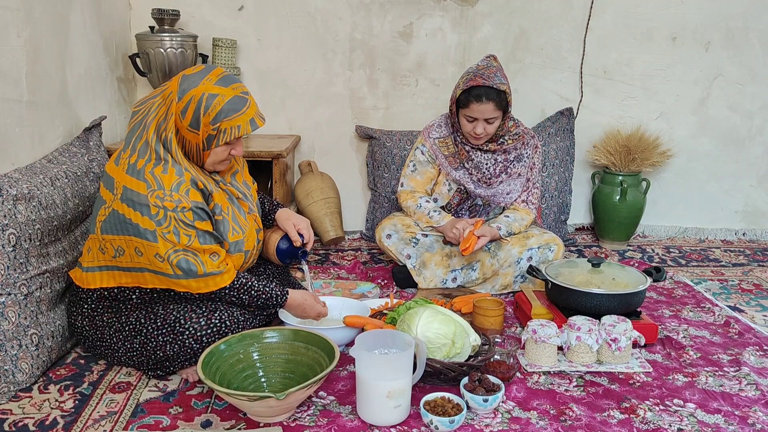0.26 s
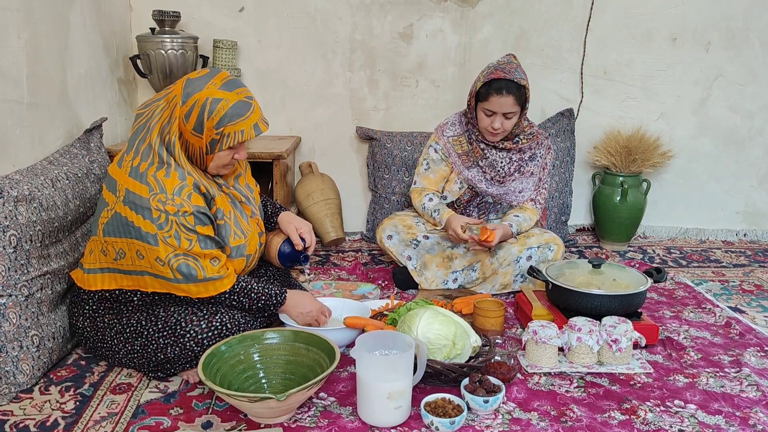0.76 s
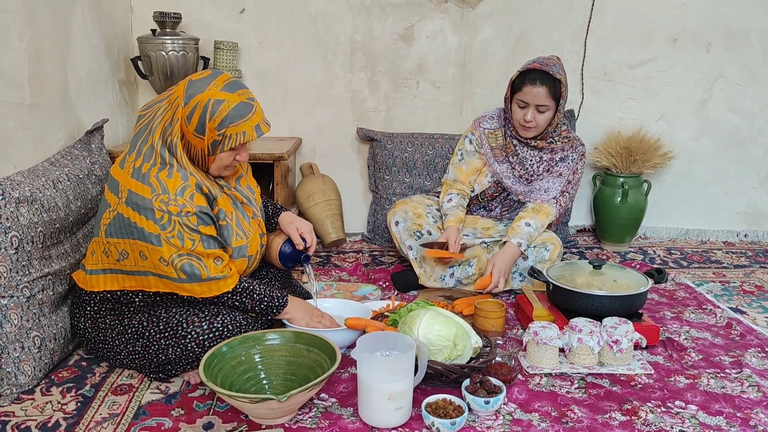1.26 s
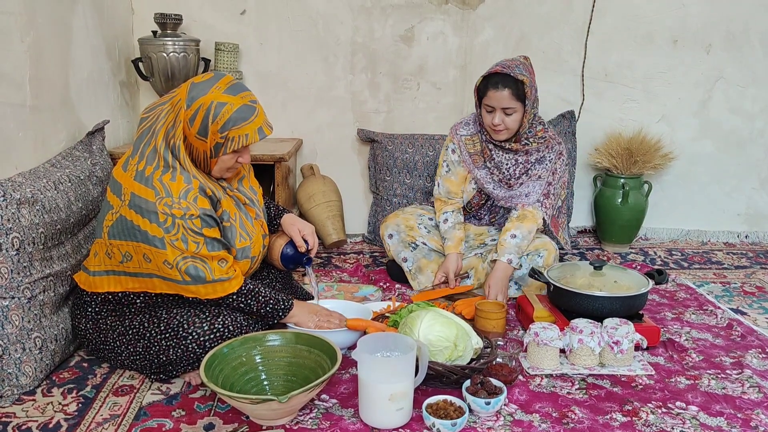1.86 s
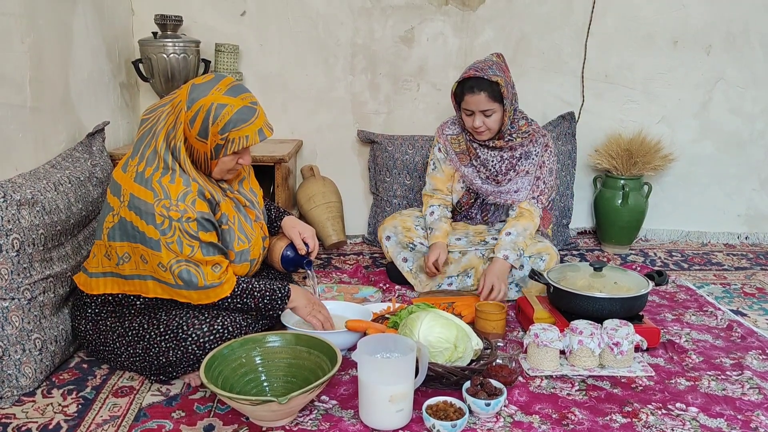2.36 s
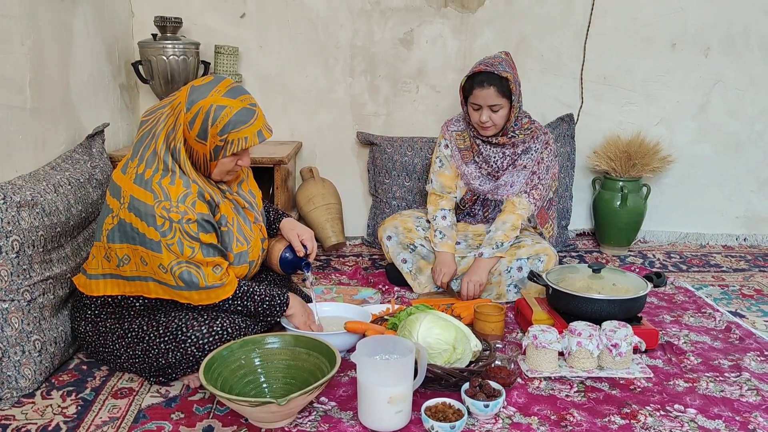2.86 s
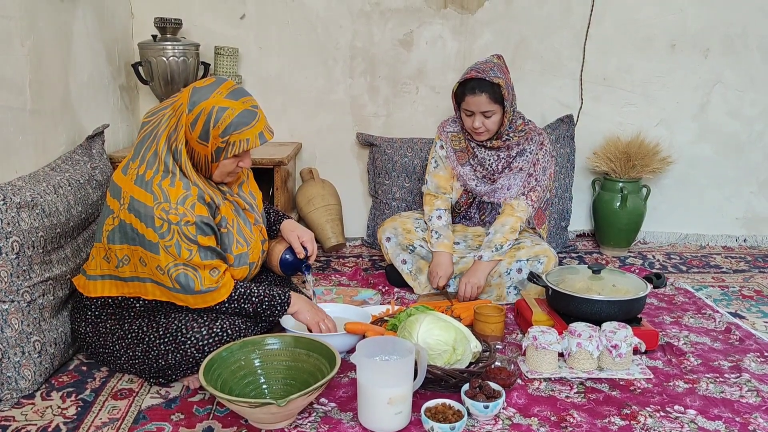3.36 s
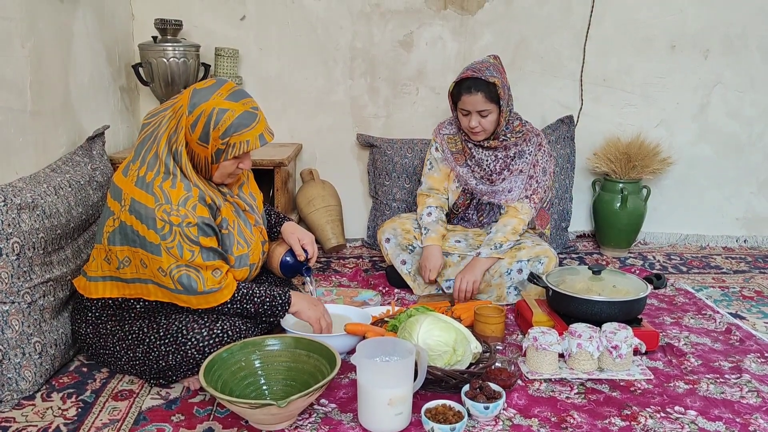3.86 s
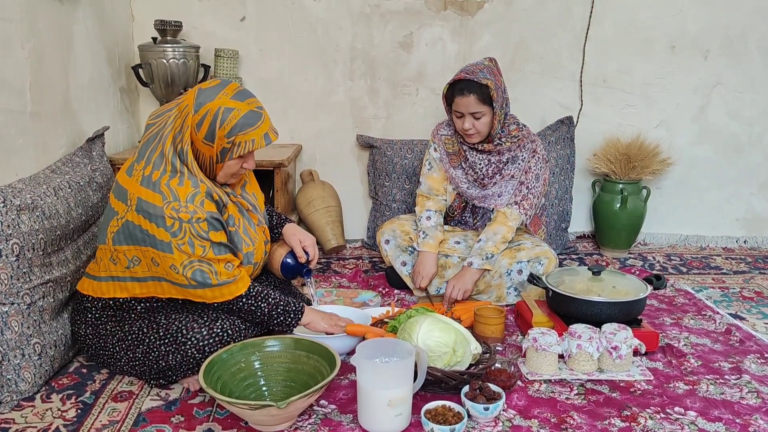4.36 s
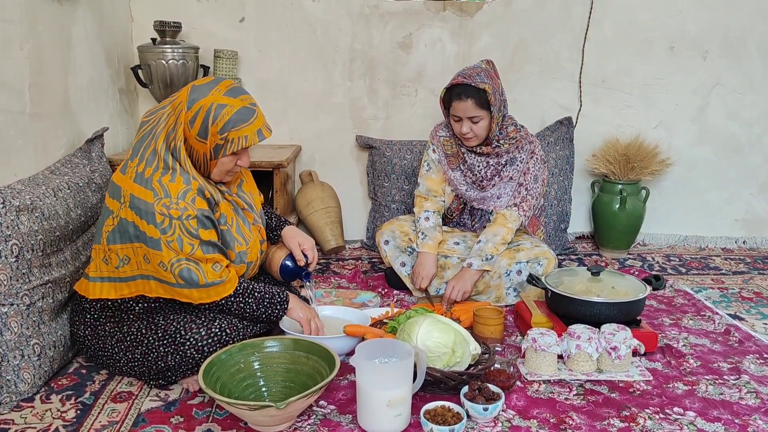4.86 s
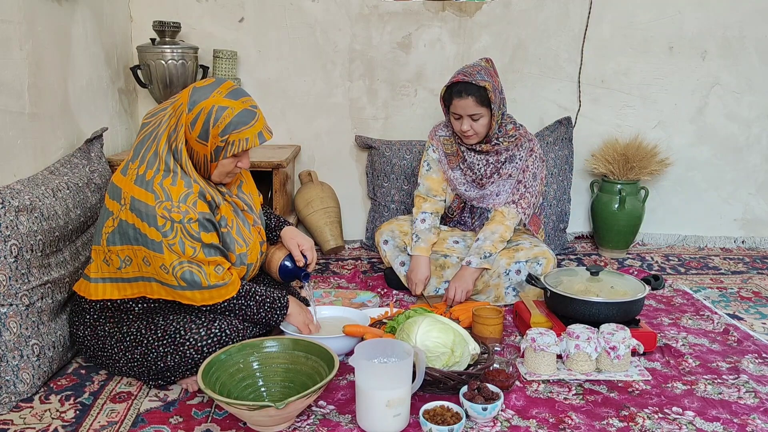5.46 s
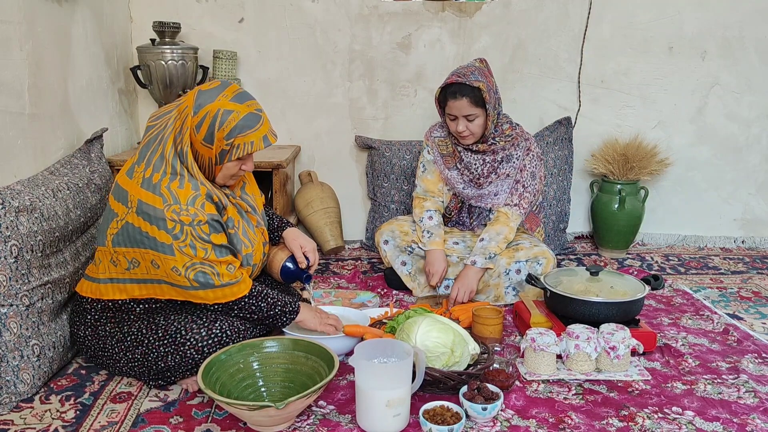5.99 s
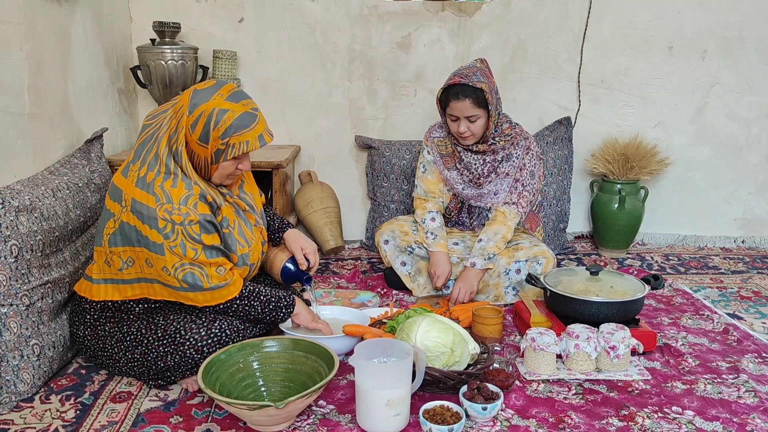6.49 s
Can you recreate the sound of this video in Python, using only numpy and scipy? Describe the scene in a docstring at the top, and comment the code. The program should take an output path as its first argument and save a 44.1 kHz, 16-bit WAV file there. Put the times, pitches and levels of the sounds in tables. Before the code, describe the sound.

Continuous irregular swishing and scratching of soaked grains, with bright plips of bubbles and little flicks against the bowl. Dull muffled knocks and a faint board shuffle sit below in the first two seconds or so. Two loud, woody carrot cuts follow, each a very quick double blow. A tiny rising gurgle comes near the end. Lively small carpeted room, near stereo microphone, quiet background.

```python
"""Rinsing rice and cutting carrot

Indoors, a hand stirs and rubs rice in a bowl of water while a knife cuts carrot on a wooden board on carpet.
Filtered grain noise rasps, chirped decaying sines plop as bubbles, and struck modes with noise bursts make
two cuts, each of two blows. Things set down ring low modes of the floor and the hollow under the board.
Echoes and a decaying tail surround these sounds; a faint hush of coloured noise lies beneath."""
import sys
import numpy as np
from scipy import signal
from scipy.fft import rfft, irfft, next_fast_len
from scipy.io import wavfile
from scipy.ndimage import uniform_filter1d

SR = 44100
rng = np.random.default_rng(int(sys.argv[2]) if len(sys.argv) > 2 else 0)


def log_audio(samples):
    """Write samples as a 16-bit WAV file to the path given in sys.argv[1]."""
    # one column per channel
    frames = np.atleast_2d(samples).T
    # limit to full scale, then quantise
    limited = np.clip(frames, -1, 1)
    pcm = np.round(limited * 32767).astype(np.int16)
    wavfile.write(sys.argv[1], SR, pcm)


N = 296821

# spectra of the wet grains, from coarse rasp to slosh: frequency_hz, relative_level_db (per Hz)
RASP_SPECTRUM = [(1200, -23.5), (2200, -4), (2800, -2.5), (3500, 0), (4800, -4.5), (5800, -22.5)]
SHARP_SPECTRUM = [(4600, -19), (5600, -5), (7000, 0), (7600, -5), (8300, -25.5)]
SAND_SPECTRUM = [(6000, -21), (8300, -0.5), (10000, 0), (12000, 4.5), (14500, -4)]
SLOSH_SPECTRUM = [(300, -25), (600, 5), (1000, 4), (1500, 1), (2200, -18.5)]
FIZZ_DB = -6  # re rasp
RUB_GAIN = .42  # overall gain of the rubbing, before the room


def rinsing():
    """Stick-slip friction: wet grains rasp in bursts and free small bubbles while the water slops about."""
    rasp_gain, sharp_gain, sand_gain, slosh_gain = strokes()
    # every grain size slips and catches in its own time
    rasp = unit(colour(grains(1500, 3.8, .6), RASP_SPECTRUM)) * undb(3.8 * walk(40))
    sharp = unit(colour(grains(2500, 3.8, 0.51), SHARP_SPECTRUM)) * undb(2.94 * walk(40))
    sand = unit(colour(grains(810, 3.3, 0.94), SAND_SPECTRUM)) * undb(4.0 * walk(30))
    slosh = unit(colour(grains(300, 3.0, 0.47), SLOSH_SPECTRUM)) * undb(1.65 * walk(25))
    rubbing = rasp_gain * (rasp + undb(FIZZ_DB) * fizz(per_s=300))
    return RUB_GAIN * (rubbing + sharp_gain * sharp + sand_gain * sand + slosh_gain * slosh)


# strokes of the hand through the rice, levels before RUB_GAIN: peak_s, rise_s (over 10 dB), fall_s (over 10 dB),
# rasp_level_db, then in dB re rasp: sharp_db, sand_db, slosh_db
HAND_STROKES = [(.01, .02, .08, -61, -2, -12, -3), (.08, .02, .13, -53.5, -2, -16, -22),
                (.27, .02, .12, -59, -1, -2, -24), (.53, .08, .2, -59, -3, -20, -13),
                (.635, .015, .12, -64, 2, 0, -15), (.78, .02, .06, -53, -12, -22, -5),
                (.89, .06, .05, -52.5, -3, -8, -16), (1.0, .04, .1, -72, 10, 2, 9),
                (1.17, .12, .2, -66, 7, -2, 1), (1.5, .08, .05, -59.5, -5, -15, -4),
                (1.66, .04, .05, -61, -8, -24, -14), (1.83, .05, .1, -58.5, -6, -20, -9),
                (1.985, .04, .12, -60, -2, -5, -6), (2.13, .06, .05, -63, -6, -20, -4),
                (2.19, .03, .05, -60, -6, -17, -14), (2.28, .015, .08, -58.5, -15, -16, 0),
                (2.41, .12, .08, -52, -4, -13, -10), (2.54, .02, .2, -62, 4, -4, -10),
                (2.67, .1, .25, -55, -3, -11, -22), (2.88, .12, .1, -64, 1, -9, 3),
                (2.985, .1, .03, -59, 3, -5, -8), (3.09, .03, .05, -60.5, -9, -24, -19),
                (3.18, .04, .06, -58.5, -4, -16, -20), (3.28, .02, .12, -59, 1, -11, -24),
                (3.4, .015, .12, -53.5, 1, -22, -1), (3.66, .1, .17, -49.5, -5.5, -24, -5),
                (3.87, .15, .1, -51, -4, -16, -4), (4.12, .05, .1, -61.5, 3, -16, -17),
                (4.18, .04, .1, -58, 3, -2, -20), (4.28, .04, .08, -60, -6, -14, -20),
                (4.35, .04, .1, -62, -2, -4, 0), (4.41, .05, .15, -58, -4, -15, -7),
                (4.53, .05, .1, -61, 0, -18, -4), (4.78, .02, .06, -55, -10, -28, 0),
                (4.86, .04, .12, -57, -5, -24, -2), (5.01, .06, .1, -57, -1, -10, -7),
                (5.18, .14, .14, -50.5, 2, -9, -7), (5.59, .02, .12, -60, -8, -18, -8),
                (5.71, .06, .06, -59.5, -3, -14, -7), (5.93, .06, .09, -60, 0, -9, -9),
                (6.09, .015, .06, -60.5, -20, -30, -16), (6.24, .02, .08, -68, -4, -16, -8),
                (6.49, .06, .1, -61, -10, -12, -6), (6.62, .1, .3, -58.5, -1, -9, -5)]
# fingers resting in the rice between strokes: rasp_level_db, then in dB re rasp: sharp_db, sand_db, slosh_db
RESTING_HAND = (-74, 0, -8, 3)


def strokes():
    """Power summation: exponential swells and decays add in power to the resting hand, giving four gains."""
    def layer_gains(rasp_db, *relative_db):
        return undb(rasp_db + np.array([0, *relative_db]))[:, None]

    t = np.arange(0, N / SR, .002)
    power = layer_gains(*RESTING_HAND) ** 2
    for peak_s, rise_s, fall_s, *levels_db in HAND_STROKES:
        swell = undb(-10 * np.maximum((peak_s - t) / rise_s, (t - peak_s) / fall_s))
        power = power + (layer_gains(*levels_db) * swell) ** 2
    return [np.interp(np.arange(N) / SR, t, np.sqrt(p)) for p in power]


def grains(per_s, scatter_db, bed):
    """Shot noise: random clicks of uneven size over a steady bed of noise."""
    size = np.minimum(rng.exponential(size=N), 4)
    clicks = (rng.random(N) < per_s / SR) * rng.standard_normal(N) * undb(scatter_db * size)
    return unit(clicks) + bed * rng.standard_normal(N)


def fizz(per_s):
    """Random superposition: small bubbles freed at random between the grains, most of them weak."""
    out = np.zeros(N)
    for when, size, strength in rng.random((int(per_s * N / SR), 3)):
        add(out, when * N / SR, strength ** 5.4 * plop(1500 * 4.35 ** size, 9.4, 0.089))
    return unit(out)


# the larger plops: start_s, nominal pitch_hz, level_db
LARGE_BUBBLES = [(0.077, 5460, -41.5), (0.119, 4600, -55), (0.272, 2130, -54), (0.31, 2840, -48),
                 (0.513, 1400, -56), (0.549, 3720, -50), (0.784, 2280, -43.5), (0.866, 2930, -44.5),
                 (0.88, 3710, -47), (0.993, 1540, -55.5), (1.173, 1140, -58.5), (1.651, 5050, -53.5),
                 (1.809, 2470, -53), (1.83, 2100, -53), (2.187, 4300, -52), (2.277, 1440, -53.5),
                 (2.363, 1860, -47), (2.405, 1350, -52), (2.631, 2220, -52), (2.733, 1180, -53),
                 (3.079, 2190, -53.5), (3.178, 2620, -56), (3.271, 3650, -49), (3.341, 2090, -54),
                 (3.66, 3430, -46), (4.405, 2660, -52), (4.766, 2890, -47.5), (4.809, 740, -53.5),
                 (4.93, 1404, -55.5), (5.03, 1047, -55), (5.764, 966, -59), (5.907, 3280, -56),
                 (5.944, 1510, -58), (6.014, 1213, -49), (6.086, 2550, -48.5), (6.291, 2370, -61),
                 (6.424, 1115, -63), (6.567, 3860, -51), (6.572, 1170, -59), (6.593, 2140, -52.5)]


def bubbles():
    """Bubble resonance: each large plop is joined by two of nearly its size within 15 ms."""
    out = np.zeros(N)
    companions = rng.uniform(-1, 1, (len(LARGE_BUBBLES), 2, 2))
    for (start_s, pitch_hz, level_db), chance in zip(LARGE_BUBBLES, companions):
        add(out, start_s, undb(level_db) * plop(.96 * pitch_hz, 7.3, 0.036))
        for late, detune in chance:
            companion = plop((0.968 + 0.067 * detune) * pitch_hz, 5.7, 0.034)
            add(out, start_s + .015 * abs(late), undb(level_db - 3.5) * companion)
    return out


# a trapped pocket of air; pitch and level here are centres that each bubble scatters about
GURGLE_S, GURGLE_LENGTH_S, GURGLE_DB = 6.0, .22, -61.5
GURGLE_HZ, GURGLE_RISE_HZ_PER_S = 1100, 900


def gurgle(count=12):
    """Bubble resonance: a trapped pocket of air lets out a quick string of bubbles that climbs in pitch."""
    out = np.zeros(N)
    for k, (late, detune, size) in enumerate(rng.uniform(-1, 1, (count, 3))):
        since_s = (k + .4 * late) / count * GURGLE_LENGTH_S
        pitch_hz = (GURGLE_HZ + GURGLE_RISE_HZ_PER_S * since_s) * (1 + .04 * detune)
        add(out, GURGLE_S + since_s, undb(GURGLE_DB + 3.0 * size) * plop(pitch_hz, 8.5, 0.02))
    return out


def plop(hz, cycles, rise):
    """Damped bubble resonance: a decaying sine rises in pitch as the bubble nears the surface."""
    life_s = cycles / hz
    t = np.arange(int(7 * life_s * SR)) / SR
    return np.sin(2 * np.pi * hz * (t + rise * t ** 2 / life_s)) * np.exp(-t / life_s)


# grains and peel flicked against the bowl: start_s, level_db, sharp_db (re level), wet_slap_db (re level)
FLICKS = [(.071, -56, -1, -30), (.259, -57.5, 1.5, -25), (.463, -62, -6, -25), (.506, -58.5, -2, -24),
          (.625, -61, 6, -25), (.772, -57.5, -12, 1), (2.18, -61, -3, -25), (2.27, -60, -14, 2.5),
          (2.72, -66.5, -6, 6), (3.071, -63, -3, -25), (3.159, -59.5, -1, -27), (3.384, -59, 3.5, 1),
          (4.162, -59, 6, -25), (4.18, -63, 6, -25), (4.196, -64, 8, -25), (4.339, -68.5, 0, 5),
          (4.77, -62.5, -13, 5), (5.163, -59, 8, -25), (6.13, -65, 2.5, -20), (6.239, -70.5, 6, -20)]


def ticks():
    """Impact noise: sudden rasp-coloured bursts decay at two rates, some with a slap of water under them."""
    out, t = np.zeros(N), np.arange(SR // 10) / SR
    fade = 1.5 * np.exp(-t / 0.003) + 0.31 * np.exp(-t / 0.019)  # a flick, then grains rattle on
    noises = rng.standard_normal((len(FLICKS), len(t)))
    for (start_s, level_db, sharp_db, slap_db), noise in zip(FLICKS, noises):
        rasp = unit(colour(noise, RASP_SPECTRUM))
        sharp = unit(colour(noise, SHARP_SPECTRUM) + 0.079 * colour(noise, SAND_SPECTRUM))
        slap = unit(colour(noise, SLOSH_SPECTRUM))
        burst = rasp + undb(sharp_db) * sharp + undb(slap_db) * slap
        add(out, start_s, undb(level_db) * burst * fade)
    return out


# each cut lands in two blows: start_s, board_level_db (before high-pass and room), snap pitch_hz,
# then in dB re board: snap_db, overtone_db, crack_db
CUT_BLOWS = [(3.5217, -23, 1000, -6, -6, -14), (3.5311, -23.5, 1433, -5, 1, -2),
             (5.2357, -19.5, 1728, -12, -5, -13), (5.2448, -29, 1814, 8, -2, -1)]
# resonances of the wooden board: frequency_hz, relative_level_db, t60_s
BOARD_MODES = [(275, -12, 0.07), (335, -17, 0.04), (620, -8, 0.03), (760, -6, 0.015), (1000, 5, 0.009),
               (1263, -2.5, 0.017), (1780, -2, 0.02), (2100, -10, 0.0072), (2780, -2.5, 0.02),
               (3500, 1.5, 0.016), (4600, 1, 0.011)]
# spectrum of the tearing fibres: frequency_hz, relative_level_db (per Hz)
CRACK_SPECTRUM = [(300, -43), (700, -7), (1500, 6.5), (3000, -13), (4800, -6.5), (5500, -28), (7300, -22),
                  (8300, -46), (14000, -44)]
BOARD_WET_DB = -3.5  # share of echo from the board


def chops():
    """Modal excitation: fibres crack, carrot snaps and board rings; each blow finds its own room paths."""
    out, t = np.zeros((2, N)), np.arange(SR // 3) / SR
    tear = np.exp(-t / 0.0045) + .1 * np.exp(-t / .03)  # a split, then fibres tear on
    high_pass = signal.butter(3, 230, "high", fs=SR, output="sos")  # a small board radiates no deep bass
    noises = rng.standard_normal((len(CUT_BLOWS), len(t)))
    for (start_s, level_db, pitch_hz, snap_db, overtone_db, crack_db), noise in zip(CUT_BLOWS, noises):
        snap = ring([(pitch_hz, 0, .022), (1.06 * pitch_hz, -3, .022)], .0001)
        overtone = ring([(1.96 * pitch_hz, 0, .02)], .0001)
        crack = unit(colour(noise, CRACK_SPECTRUM)) * tear
        blow = ring(BOARD_MODES, 0.00035) + undb(snap_db) * snap
        blow = blow + undb(overtone_db) * overtone + undb(crack_db) * crack
        blow = signal.sosfilt(high_pass, blow)
        add(out, start_s, undb(level_db) * signal.fftconvolve(blow[None], room(BOARD_WET_DB), axes=1))
    return out


# things set down on board and carpet: start_s, floor_peak_db, hollow_peak_db (both before the room)
LANDINGS = [(0.118, -56, -59), (0.406, -55.5, -61), (0.627, -45, -56), (0.901, -55.5, -75),
            (1.162, -47, -53.5), (1.508, -50, -54), (1.771, -47, -53), (1.8, -49.5, -45), (1.984, -53, -39),
            (2.059, -44.5, -33), (2.109, -51, -46), (2.197, -47.5, -51.5), (2.275, -69, -47),
            (2.565, -52, -59.5), (2.899, -57.5, -63), (3.202, -48.5, -62), (4.079, -68, -55.5)]
# resonances of the floor, then of the hollow under the board: frequency_hz, relative_level_db, t60_s
FLOOR_MODES = [(61, -10.5, 0.13), (94, -24.5, 0.059), (122, 2.5, 0.092), (190, -7, 0.18)]
HOLLOW_MODES = [(216.5, -4.5, 0.046), (271, 0, 0.11), (324, -5, 0.13), (355, -6.5, 0.084),
                (590, -14.5, 0.06), (800, -15, 0.03), (1250, -15, 0.025)]
# the board shifts on the carpet, level gliding from row to row: time_s, level_db
BOARD_SHUFFLE = [(0.9, -82), (1.058, -81), (1.356, -69), (1.852, -76.5), (1.98, -70)]


def thuds():
    """Modal excitation: landings move the floor and ring the hollow; friction noise rumbles under the board."""
    out = np.zeros(N)
    for start_s, floor_db, hollow_db in LANDINGS:
        floor = undb(floor_db) * ring(FLOOR_MODES, 0.0066)
        hollow = undb(hollow_db) * ring(HOLLOW_MODES, 0.00094)
        add(out, start_s, floor + hollow)
    time_s, level_db = np.transpose(BOARD_SHUFFLE)
    spectrum = [(90, -24), (180, 2.5), (330, 2.5), (480, -6.5), (900, -26)]  # (Hz, dB per Hz)
    rumble = unit(colour(rng.standard_normal(N), spectrum))
    return out + undb(np.interp(np.arange(N) / SR, time_s, level_db, -90, -90)) * rumble


def ring(modes, push_s):
    """Modal superposition: decaying modes of alternating sign, struck by a smooth push; peak 1."""
    t = np.arange(SR // 3) / SR
    y = np.zeros(len(t))
    for k, (hz, db, t60_s) in enumerate(modes):
        y += (-1) ** k * undb(db) * np.sin(2 * np.pi * hz * t) * 1000. ** (-t / t60_s)
    y = np.convolve(y, np.hanning(int(push_s * SR) + 3))[:len(t)]
    return y / np.abs(y).max()


# early wall echoes, before jitter and wet share: delay_s, level_db
WALL_ECHOES = [(.005, -10.5), (.009, -3.5), (.014, -7), (.019, -3.5), (0.028, -12)]
# reverberation time of the tail: frequency_hz, t60_s
TAIL_DECAY = [(100, 0.36), (400, 0.36), (1500, 0.33), (5000, 0.23), (12000, 0.18)]
# colour of the diffuse tail: frequency_hz, level_db (re direct sound, before wet share)
TAIL_COLOUR = [(100, 2.5), (350, 0.5), (800, 3.5), (8000, 5.5)]


def room(wet_db):
    """Impulse response to two ports: direct sound, wall echoes and a diffuse tail that fades band by band."""
    t = np.arange(SR // 2) / SR
    noise, hz = rfft(pair(1250, size=len(t))), 2. * np.arange(len(t) // 2 + 1)
    tail = 0
    for centre_hz in 60 * 2. ** np.arange(9):
        octave = np.maximum(1 - np.abs(np.log2(np.maximum(hz, 30) / centre_hz)), 0)
        tail = tail + irfft(noise * octave, len(t)) * 1000. ** (-t / on_log(TAIL_DECAY, centre_hz))
    tail = tail * np.clip(t / 0.0056, 0, 1)
    response = undb(wet_db) * colour(tail / np.sqrt(np.sum(tail ** 2) / 2), TAIL_COLOUR)
    response[[0, 1], [0, 1]] = 1  # direct sound, one sample later at the second port
    for (delay_s, db), (shift, angle) in zip(WALL_ECHOES, rng.uniform(-1, 1, (len(WALL_ECHOES), 2))):
        # an echo from the side reaches one port a little earlier
        at = (delay_s + .001 * shift + np.array([1, -1]) * .00015 * angle) * SR
        response[[0, 1], at.astype(int)] += undb(db + wet_db)
    return response


BOWL_WET_DB = -0.5  # share of echo from the bowl and the carpet


def moving(source, count, hold_s):
    """Time-varying convolution: the hands keep moving, so successive moments take different room paths."""
    k = int(hold_s * SR)
    spot = np.repeat(rng.integers(0, count, N // k + 1), k)[:N]
    out = 0
    for i in range(count):
        share = np.sqrt(np.abs(uniform_filter1d(1. * (spot == i), k // 2)))
        out = out + signal.fftconvolve(source * share, room(BOWL_WET_DB), axes=1)[:, :N]
    return out


# spectrum of the background: frequency_hz, relative_level_db (per Hz)
HUSH_SPECTRUM = [(15, -31), (25, 3.5), (253, 1.5), (493, -9), (934, -8.5), (1630, -10), (3540, -8.5),
                 (4620, -10.5), (6880, -12), (8290, -24.5), (14500, -21)]
HUSH_DB = -62  # centre of a slowly wandering level


def background_hush():
    """Partly coherent noise: a faint hush, more alike at the two ports in the bass, wanders in level."""
    noise = unit(colour(pair(510, size=N + N % 2), HUSH_SPECTRUM))[:, :N]
    return noise * undb(HUSH_DB + 1.0 * walk(5))


def pair(likeness_hz, size=N):
    """Mid-side coherence: two noises, alike below likeness_hz and unrelated above."""
    mid, side = rng.standard_normal((2, size))
    side = colour(side, [(likeness_hz / 12, -7), (likeness_hz / 3, -9), (likeness_hz, 0)])
    return np.array([mid + side, mid - side])


def walk(rate):
    """Random modulation: levels held 1 / rate s and slewed; spread near 1."""
    k = int(SR / rate)
    return uniform_filter1d(np.repeat(rng.standard_normal(N // k + 1), k), k)[:N]


def undb(db):
    """Decibel law: amplitude ratio of a level in dB."""
    return 10 ** (np.asarray(db) / 20)


def on_log(table, hz):
    """Logarithmic frequency scale: read a (Hz, value) table between its points."""
    at, value = np.transpose(table)
    return np.interp(np.log(np.maximum(hz, 1)), np.log(at), value)


def colour(x, table, share=1):
    """Spectral shaping: filter x by a (Hz, dB) table, its dB scaled by share."""
    size = x.shape[-1]
    hz = np.arange(size // 2 + 1) * SR / size
    return irfft(rfft(x) * undb(share * on_log(table, hz)), size)


def unit(x):
    """Power normalisation: scale to an RMS of 1."""
    return x / np.sqrt(np.mean(x ** 2))


def add(track, s, sound):
    """Linear superposition: mix a sound into the track at s seconds."""
    i = int(s * SR)
    track[..., i:i + sound.shape[-1]] += sound[..., :N - i]


def scene():
    """Superposition of sources: bowl, cuts and landings in the room, over the hush."""
    bowl = moving((rinsing() + bubbles() + gurgle() + ticks())[None], count=5, hold_s=.05)
    carpet = moving(thuds()[None], count=3, hold_s=.12)
    return bowl + chops() + carpet + background_hush()


# response of the microphone: frequency_hz, gain_db
MIC_RESPONSE = [(25, -2), (60, -1), (150, 1.5), (200, -1), (390, 1.5), (480, -4), (570, 0), (1000, -0.5)]
# contrast between the ports, scaled by a share for each: frequency_hz, contrast_db
PORT_CONTRAST = [(700, 0.5), (2300, -2.5), (4300, -1.5), (7000, -15.5), (7700, -4), (8600, 7),
                 (14000, -0.5)]
TOP_HZ = 14300


def record(dry):
    """Transducer response: the microphone colours the sound, its two ports differ, and the top is cut."""
    padding = next_fast_len(N + 999, True) // 2 * 2 - N
    even = colour(np.pad(dry, ((0, 0), (0, padding))), MIC_RESPONSE)
    left = colour(even[0], PORT_CONTRAST, 0.38)
    right = colour(even[1], PORT_CONTRAST, -0.48)
    low_pass = signal.ellip(12, .2, 75, TOP_HZ, fs=SR, output="sos")
    return signal.sosfilt(low_pass, np.array([left, right])[:, :N])


dry = scene()
out = record(dry)
log_audio(out)
```